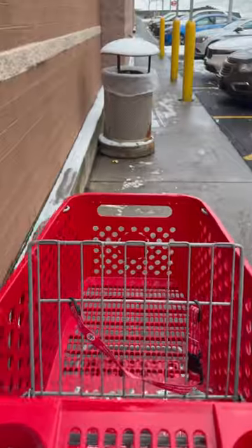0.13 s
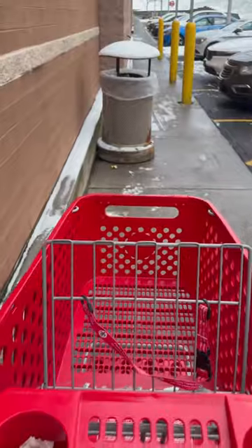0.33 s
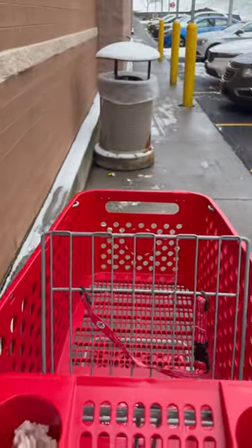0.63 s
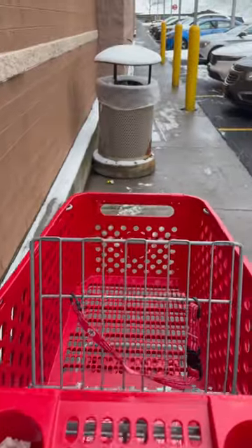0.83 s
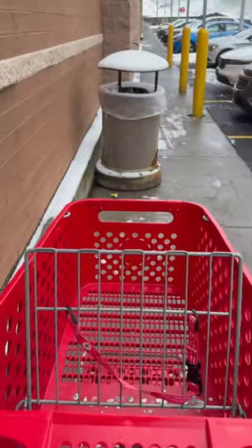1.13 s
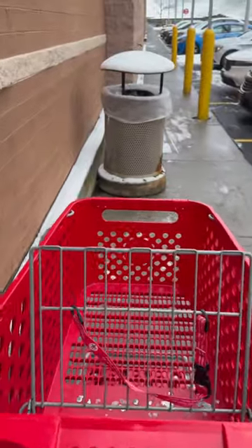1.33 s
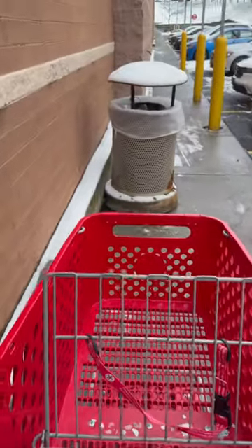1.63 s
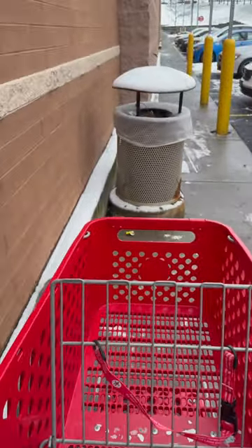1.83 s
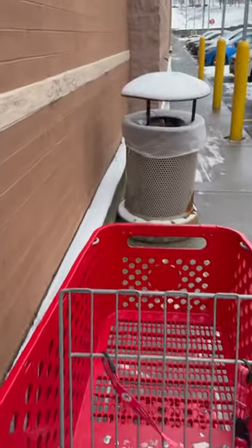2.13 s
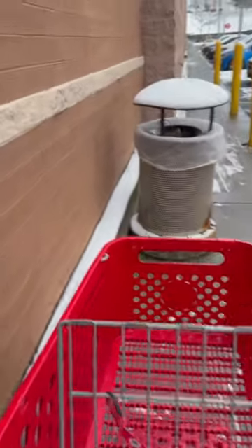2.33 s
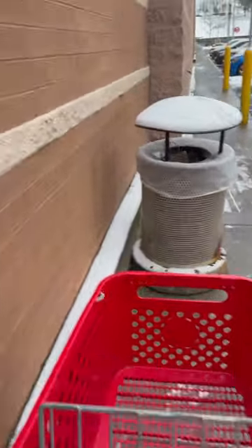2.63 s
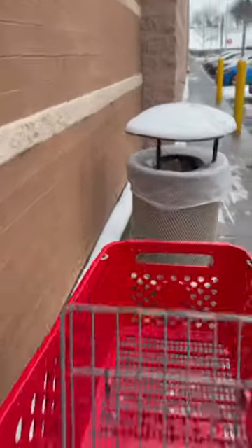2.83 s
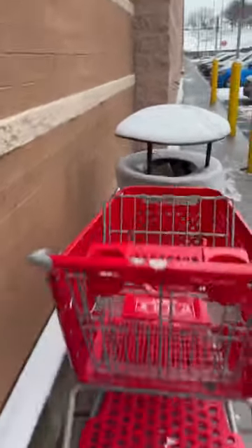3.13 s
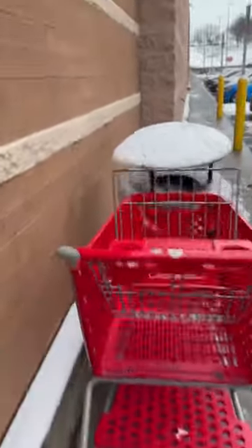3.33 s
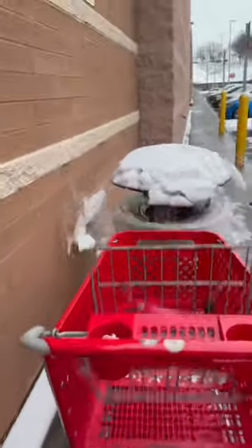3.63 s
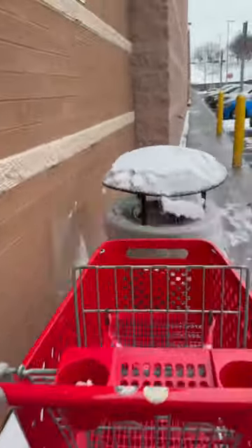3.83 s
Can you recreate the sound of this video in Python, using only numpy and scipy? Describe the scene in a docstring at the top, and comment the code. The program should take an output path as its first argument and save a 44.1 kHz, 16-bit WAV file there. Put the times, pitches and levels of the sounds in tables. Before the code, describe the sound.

A shopping cart rattles and clacks close to the microphone over outdoor pavement beside a wall, jolts over joints, then is shoved off, clatters into a metal trash can, rebounds and drops on its wheels.

```python
"""A shopping cart with a steel frame and a plastic basket rolls over pavement, close to the microphone.
Its loose steel clacks as struck noise with ringing modes, and random contacts make it rattle, hardest over joints.
Shoved off, it clatters into a metal trash can in runs of contacts, rebounds with its seat flapping
and drops back on its wheels. Behind it: wheels drumming as low noise, a short wall tail and faint street noise."""
import sys
import numpy as np
from scipy import signal
from scipy.fft import rfft, irfft, next_fast_len
from scipy.io import wavfile
from scipy.ndimage import uniform_filter1d

SR = 44100
rng = np.random.default_rng(int(sys.argv[2]) if len(sys.argv) > 2 else 0)


def to_wav(sig):
    """Store sig (one row per channel, or 1-D mono) as 16-bit WAV at the path in sys.argv[1].

    Samples outside -1..1 are clipped; the rate is SR.
    """
    pcm = np.clip(np.atleast_2d(sig), -1, 1) * 32767
    pcm = np.round(pcm).astype(np.int16)
    wavfile.write(sys.argv[1], SR, pcm.T)  # frames by channels


N = 176400  # samples in the scene
T = np.arange(SR // 3) / SR  # time within one contact, s

# Levels are relative within each table. Colours are spectra; t60 is the time to fall by 60 dB.

# Loose steel parts striking the frame.
# Each row: start in seconds, level in dB, share of the basket in dB, share of the wire gate in dB.
CLACK_EVENTS = [(0.057, -14, -4.5, -8.5), (0.0799, -8, -5.5, -16), (0.1288, -17.5, -16, -12.5),
                (0.1537, -23.5, 5, -11), (0.192, -25.5, -8, -11), (0.199, -26.5, 12, -24),
                (0.254, -20, -19, -21), (0.2877, -17.5, -2.5, -25), (0.3157, -18.5, -4, -22),
                (0.4317, -33.5, 17, -6), (0.4583, -17, -9, -14), (0.5387, -21.5, 7, -9.5),
                (0.591, -25, -6, -19), (0.6782, -22.5, 6, -27), (0.7014, -17, -25, -16),
                (0.7165, -10, -15, -16), (0.7263, -18.5, 4, -50), (0.7673, -19.5, 4.5, -23),
                (0.8123, -11, -4, -17), (0.8364, -14.5, 3, -23), (0.8955, -10, -10, -11),
                (0.9327, -5, -24, -12), (0.9602, -16, -5, -9), (0.9777, -6.5, -34, -16),
                (1.0193, -19, -14, -9), (1.0337, -8.5, -20, -14), (1.054, -13, -4, -16),
                (1.073, -10.5, 0.5, -10), (1.0894, -26.5, -6, 3), (1.116, -16.5, -4, -31),
                (1.175, -26, 9, -10), (1.2434, -26, 10, -8), (1.3222, -14.5, -6, -27),
                (1.3585, -23, 6.5, -15), (1.4373, -26, 8.5, -23), (1.483, -19.5, -14, -27),
                (1.5489, -27.5, 8, -12), (1.5878, -16.5, -8, -24), (1.6148, -23.5, 6, -46),
                (1.632, -21.5, 5.5, -35), (1.6648, -20.5, -3, -21), (1.7054, -18, -3, -14),
                (1.7095, -11, -11.5, -47), (1.7351, -12, -10, -39), (1.8705, -18, -25, -44),
                (1.8948, -24.5, 4.5, -18), (1.9988, -9.5, -7, -17.5), (2.034, -9, -18, -20),
                (2.0925, -5.5, -3, -40), (2.2619, -14, -0.5, -33), (2.3232, -18, -3, -13),
                (2.3847, -23, 3.5, -25), (2.5469, -43, 17.5, -11), (2.8857, -26.5, 10, -12),
                (2.937, -10, -28, -30), (3.0095, -21, -7, -4), (3.1783, -8.5, -32, -17),
                (3.7078, -9.5, 3, -9), (3.9482, -20, -7, -4), (3.956, -14, -15.5, -10)]
# Light, dry ticks of loose wires. Each row: start in seconds, level in dB.
TICK_EVENTS = [(.0405, -41), (0.3902, -25.5), (0.807, -18), (1.224, -26), (1.5177, -44), (1.967, -35),
               (2.4555, -62)]
# Knocks that leave one frame bar ringing. Each row: start in seconds, level in dB.
BAR_KNOCK_EVENTS = [(.538, -26.5), (.553, -30), (.96, -31), (1.05, -24), (1.71, -34.5), (2.27, -39)]
# Steady shaking while the cart is pushed. Each row: time in seconds, wire level in dB, basket level in dB.
PUSHED_SHAKING = [(.04, -44, -30.5), (.12, -37, -33.5), (.24, -45, -35.5), (.50, -41.5, -36),
                  (.68, -39, -37.5), (.76, -33.5, -34.5), (.88, -35, -31.5), (.96, -53, -25),
                  (1.13, -38, -28.5), (1.30, -61, -41), (1.37, -36, -35.5), (1.52, -49, -39.5),
                  (1.74, -42, -34.5), (1.84, -51.5, -44.5), (1.98, -48, -37), (2.21, -50, -28.5),
                  (2.35, -69, -35), (2.46, -60, -40.5), (2.54, -48, -55), (2.60, -37, -37.5),
                  (2.70, -75, -46.5), (2.86, -54, -35)]
# Shaking once the cart is let go. Each row: time in seconds, wire level in dB, basket level in dB.
FREE_SHAKING = [(2.875, -65, -39), (2.895, -21.5, -31.5), (2.93, -24.5, -28.5), (2.955, -15.5, -22.5),
                (3.05, -15.5, -21), (3.138, -19, -23), (3.168, -36, -28), (3.185, -30, -37),
                (3.26, -19, -22.5), (3.36, -21, -29), (3.40, -25, -36.5), (3.46, -21.5, -27.5),
                (3.58, -23.5, -34.5), (3.63, -21.5, -31), (3.695, -27, -31.5), (3.72, -17, -25),
                (3.80, -22.5, -32.5), (3.90, -31.5, -41), (3.942, -30, -32), (3.960, -19.5, -31),
                (4.0, -17.5, -27.5)]
# Wheels crossing pavement joints.
# Each row: peak time in seconds, level in dB, last 10 dB of rise in seconds, first 10 dB of fall in seconds.
PAVEMENT_JOINTS = [(.975, -33.5, 0.05, 0.054), (1.06, -30, 0.023, 0.064), (2.096, -20, 0.061, 0.095)]
# The cart hitting the can. Each row: start in seconds, level in dB, thud in dB, chatter length in seconds.
CAN_BLOWS = [(3.180, -17.5, -26, 0.016), (3.203, -9.5, -6, 0.0049), (3.213, -17, -6, 0.0082),
             (3.227, -11, -8, 0.016), (3.243, -13.5, 1.5, .014), (3.258, -13, -1, .014),
             (3.418, -16.5, -14, 0.0081)]
# The cart dropping back on its wheels.
# Each row: start in seconds, level in dB, thud in dB, chatter length in seconds.
WHEEL_LANDINGS = [(3.707, -14, -20, .014), (3.731, -20, -1, 0.018), (3.955, -20.5, -28, 0.02)]
# The child seat flapping. Each row: start in seconds, level in dB.
SEAT_SLAPS = [(3.243, -38), (3.327, -13.5), (3.420, -17), (3.535, -14), (3.547, -14), (3.637, -18),
              (3.648, -12.5), (3.658, -17)]
# A falling ring on the rebound. One row: start in seconds, starting pitch in Hz,
# time constant of the fall in seconds, time to the peak in seconds, level in dB, roughness from 0 to 1.
REBOUND_ZING = (3.419, 2000, .033, .017, -19, .25)
# The scuffing wheel's squeak. One row: start in seconds, starting pitch in Hz,
# time constant of the fall in seconds, time to the peak in seconds, level in dB, roughness from 0 to 1.
WHEEL_SQUEAK = (2.762, 3720, 1.4, .055, -38, .08)
# Drumming of the wheels. Each row: time in seconds, level in dB.
WHEEL_RUMBLE = [(0.04, -32), (0.36, -37.5), (2.19, -34), (2.31, -37), (2.36, -38), (2.43, -37.5),
                (3.08, -30), (3.17, -41), (3.27, -35), (3.4, -47), (3.44, -35), (4.0, -59)]
# Wheels dropping into dents. Each row: start in seconds, level in dB.
DENT_BUMPS = [(.845, -24), (1.76, -20.5), (1.865, -37), (2.34, -19), (3.46, -41)]
# A wheel scuffing as the cart is shoved. Each row: time in seconds, level in dB.
SHOVE_SCUFF = [(2.745, -39), (2.772, -27.5), (2.80, -41), (2.85, -38.5), (2.875, -40)]

# Modes of the steel frame. Each row: pitch in Hz, level in dB, t60 in seconds.
FRAME_MODES = [(421, 2, 0.076), (956, 8, 0.09), (1666, 4.5, 0.35), (1990, 14, 0.098), (2360, -19.5, 0.13),
               (3610, 1, 0.26), (4450, 6.5, 0.051), (4710, 6, 0.068), (5520, 7, 0.13), (6200, 5, 0.12),
               (7300, 3, 0.26), (7520, -21, 0.17), (8030, 4, 0.21)]
# Modes of one frame bar. Each row: pitch in Hz, level in dB, t60 in seconds.
BAR_MODES = [(1690, -8, 0.075), (1958, 1, 0.17), (2300, -3, 0.096)]
# Modes of the plastic basket. Each row: pitch in Hz, level in dB, t60 in seconds.
BASKET_BODY_MODES = [(443, 6.5, 0.082), (539, 3, 0.12), (1024, -1, 0.03), (1172, 7, 0.075)]
# Modes of the trash can. Each row: pitch in Hz, level in dB, t60 in seconds.
CAN_MODES = [(132, 5, .16), (209.6, -2, 0.39), (650, 1.5, 0.29), (829, 8, 0.2), (990, -1, 0.24),
             (1080, -6, 0.17), (1370, 11.5, 0.11), (1700, -7, 0.2), (2040, -8, 0.16), (2320, 6.5, 0.29)]
# Modes of a wheel bump. Each row: pitch in Hz, level in dB, t60 in seconds.
DENT_MODES = [(60.7, 1, 0.27), (96.5, 8, 0.1)]

# Colour of wire contacts. Each row: frequency in Hz, level in dB per Hz.
WIRE_COLOUR = [(800, -23), (1800, -3.5), (2500, -2), (3200, -6.5), (3900, -4), (4500, -2), (5200, -3),
               (6200, -0.5), (8100, 2), (10000, 2), (11500, -23), (14000, -4), (16000, -11)]
# Colour of the wire gate. Each row: frequency in Hz, level in dB per Hz.
GATE_COLOUR = [(1500, -47), (3900, -11), (4300, 1.5), (4480, 1.5), (4750, -9.5), (5200, -5.5), (6150, -2),
               (6700, -3), (12000, -11.5)]
# Colour of basket knocks. Each row: frequency in Hz, level in dB per Hz.
BASKET_COLOUR = [(90, -31), (210, -1), (320, -2), (460, 1), (700, -1), (1000, 2), (1400, 0), (2000, -2),
                 (2700, -3.5), (4000, -10), (9000, -54)]
# Colour of crash contacts. Each row: frequency in Hz, level in dB per Hz.
CRASH_COLOUR = [(90, -37), (220, 0), (450, -14.5), (1000, 0.5), (1500, -4), (2400, 0.5), (3300, -4.5),
                (5000, -10.5), (10000, -32), (16000, -40)]
# Colour of the thud under a blow. Each row: frequency in Hz, level in dB per Hz.
THUD_COLOUR = [(25, -31), (60, -14), (110, -4), (200, -7), (330, -0.5), (600, -14), (2000, -50)]
# Colour of the seat slaps. Each row: frequency in Hz, level in dB per Hz.
SEAT_COLOUR = [(200, -10.5), (700, -8), (1500, -5), (2100, -7), (2500, 7.5), (2900, -2.5), (3500, -4),
               (4500, -8), (12000, -40)]
# Colour of the drumming wheels. Each row: frequency in Hz, level in dB per Hz.
WHEEL_COLOUR = [(20, -27), (35, -7), (55, -5), (74, -1.5), (115, -6), (160, -13), (300, -21), (700, -21),
                (3000, -41)]
# Colour of the scuffing wheel. Each row: frequency in Hz, level in dB per Hz.
SCUFF_NOISE_COLOUR = [(1500, -4), (3500, -5), (5600, -1), (7000, 7.5), (8300, 3.5), (10500, 0),
                      (15000, -15)]
# Colour of the street. Each row: frequency in Hz, level in dB per Hz.
STREET_COLOUR = [(30, -18), (1000, 14), (3000, -28), (16000, -40)]

# Decay of the dense ring after a contact. Each row: frequency in Hz, t60 in seconds.
CONTACT_RING_T60 = [(200, 0.099), (1000, 0.16), (2800, 0.15), (7500, 0.12), (15000, 0.045)]
# Decay of the wall's answer. Each row: frequency in Hz, t60 in seconds.
WALL_TAIL_T60 = [(200, 1), (2000, 0.17), (8000, 0.26), (15000, 0.31)]
# Left-right likeness. Each row: frequency in Hz, likeness from -1 (opposed) to 1 (the same).
LIKENESS = [(60, 0.88), (300, 0.99), (700, 0.83), (1300, 0.97), (1900, 1), (2400, 0.53), (3300, -0.02),
            (4400, 0.3), (6000, 0.6), (8000, 0.074), (9700, -0.88), (10800, -1), (14000, -1),
            (15000, -0.59)]
# Lean of the stereo image. Each row: frequency in Hz, left above right in dB.
LEAN = [(100, 0.8), (250, 0.5), (520, 3.0), (1000, 2.8), (2000, -0.5), (6000, 0)]

START_S, TOP_HZ = .035, 15800  # silence before the start, upper band limit
FRAME_DETUNE = .018  # spread of the wires' tuning, share of the pitch
ROLL_CRACK_S, ROLL_RING_DB = .0018, -12  # rolling contacts are short and dry
ROLL_SCATTER_DB = 5  # spread of contact strengths while rolling
JOINT_BASKET_DB = -2.5  # basket against wire over a joint


def amp(db):
    """Decibels as a linear gain."""
    return 10 ** (np.asarray(db) / 20)


def unit(x):
    """Scale x to rms 1."""
    return x / np.sqrt(np.mean(x ** 2) + 1e-20)


def along(points, hz):
    """Read (Hz, value) points at any frequency, on a log axis."""
    f, v = np.transpose(points)
    return np.interp(np.log(hz + 1), np.log(f + 1), v)


def gains(rows):
    """One gain per sample for each dB column, fading to -90 dB outside the rows."""
    s, *columns = np.transpose(rows)
    times = np.r_[s[0] - .04, s, s[-1] + .04]
    t = np.arange(N) / SR
    return [amp(np.interp(t, times, np.r_[-90, db, -90])) for db in columns]


def filtered(x, response):
    """Shape x by a response given as a function of frequency."""
    n = x.shape[-1]
    m = next_fast_len(n + 4096)
    spectrum = rfft(x, m) * response(np.fft.rfftfreq(m, 1 / SR))
    return irfft(spectrum, m)[..., :n]


def noise(colour, size):
    """Two unrelated coloured noises, scaled together to rms 1."""
    return unit(filtered(rng.standard_normal((2, size)), lambda hz: amp(along(colour, hz))))


def fade(x, t60):
    """Let each frequency die at its own speed."""
    hz, t, z = signal.stft(x, SR, nperseg=256)
    decay = amp(-60 * t / along(t60, hz)[:, None])
    return signal.istft(z * decay, SR, nperseg=256)[1][:, :x.shape[1]]


def add(out, s, x):
    """Mix x into out at time s."""
    i = max(0, round(s * SR))
    out[:, i:i + x.shape[1]] += x[:, :max(0, N - i)]


def ring(modes, detune=0):
    """Decaying modes, each struck with a chance strength and phase, and detuned by chance if asked."""
    hz, db, t60 = np.transpose(modes)[:, :, None]
    strength = amp(db + 3.7 * rng.standard_normal(db.shape)) / np.linalg.norm(amp(db))
    hz = hz * (1 + detune * rng.standard_normal(hz.shape))
    wave = np.exp((2j * np.pi * hz - np.log(1000) / t60) * T)
    turn = np.exp(2j * np.pi * rng.random((2, len(modes))))
    return np.sqrt(2) * ((turn * strength.T) @ wave).real


def contact(colour, crack_s, ring_db, uneven_db=3):
    """A sharp crack that leaves a dense, short ring; every point of impact has its own colour."""
    knots = np.linspace(0, np.sqrt(TOP_HZ), num=60) ** 2
    ripple = uneven_db * rng.standard_normal(len(knots))
    x = unit(filtered(noise(colour, len(T)), lambda hz: amp(np.interp(hz, knots, ripple))))
    crack = x * np.exp(-T / crack_s)
    dense_ring = amp(ring_db) * fade(x, CONTACT_RING_T60)
    attack = 1 - np.exp(-T / 0.00055)
    return (crack + dense_ring) * attack


def struck(events, modes, attack_s):
    """One set of modes rung at each (s, dB) event."""
    out = np.zeros((2, N))
    for s, db in events:
        add(out, s, amp(db) * ring(modes) * (1 - np.exp(-T / attack_s)))
    return out


def slide(s, hz, fall_s, peak_s, db, rough):
    """A short, rough tone that swells, slides down in pitch and fades."""
    out = np.zeros((2, N))
    waver = unit(uniform_filter1d(rng.standard_normal(len(T)), size=24))
    pitch = hz * np.exp(-T / fall_s) * (1 + rough * waver)
    phase = 2 * np.pi * np.cumsum(pitch) / SR
    swell = T / peak_s * np.exp((1 - (T / peak_s) ** 2) / 2)
    add(out, s, amp(db) * swell * np.array([np.sin(phase), np.cos(phase)]))
    return out


def clacks():
    """Single blows of steel on steel; each also shakes the wire gate and knocks the basket."""
    out = np.zeros((2, N))
    usual_basket_db, usual_gate_db = np.mean(CLACK_EVENTS, axis=0)[2:]
    for s, db, basket_db, gate_db in CLACK_EVENTS:
        steel = contact(WIRE_COLOUR, crack_s=.003, ring_db=-8, uneven_db=1.0)
        steel += amp(-13.5) * ring(FRAME_MODES, FRAME_DETUNE)
        gate = contact(GATE_COLOUR, crack_s=0.0035, ring_db=-10)
        gate *= amp(gate_db - usual_gate_db - 6.0)
        basket = contact(BASKET_COLOUR, crack_s=.007, ring_db=-1)
        basket += amp(-1.0) * ring(BASKET_BODY_MODES)
        basket *= amp(basket_db - usual_basket_db - 15.0)
        add(out, s, amp(db - 5.0) * (steel + gate + basket))
    return out


def ticks():
    """Single wires touch lightly between the clacks, as short dry contacts."""
    out = np.zeros((2, N))
    for s, db in TICK_EVENTS:
        add(out, s, amp(db) * contact(WIRE_COLOUR, crack_s=ROLL_CRACK_S, ring_db=ROLL_RING_DB))
    return out


def chatter(colour, rate, scatter_db, modes_db, crack_s=.0024, ring_db=-7, count=10):
    """Loose parts, together making rate hits a second at random, each with its own ring; rms 1."""
    out = np.zeros((2, N))
    for _ in range(count):
        strengths = amp(scatter_db * np.clip(rng.standard_normal(N), -2, 2))
        hits = (rng.random(N) < rate / count / SR) * strengths
        part = contact(colour, crack_s, ring_db, uneven_db=4)
        part += amp(modes_db) * ring(FRAME_MODES, FRAME_DETUNE)
        out += signal.fftconvolve(hits[None], part, axes=1)[:, :N]
    return unit(out)


def rattle():
    """Wires and basket chatter sparsely on smooth ground, densely over joints and when let go."""
    t = np.arange(N) / SR
    jolt = np.zeros(N)
    for s, db, rise, fall in PAVEMENT_JOINTS:
        distance = np.maximum((s - t) / rise, (t - s) / fall)
        jolt += amp(db - 10 * distance ** 2.14)
    wire, basket = gains(PUSHED_SHAKING)
    wild_wire, wild_basket = gains(FREE_SHAKING)
    gentle_wire = wire * chatter(WIRE_COLOUR, rate=140, scatter_db=ROLL_SCATTER_DB, modes_db=-27,
                                 crack_s=ROLL_CRACK_S, ring_db=ROLL_RING_DB)
    gentle_basket = basket * chatter(BASKET_COLOUR, rate=260, scatter_db=ROLL_SCATTER_DB,
                                     modes_db=-18, ring_db=ROLL_RING_DB)
    hard_wire = chatter(WIRE_COLOUR, rate=710, scatter_db=1.0, modes_db=-21.0)
    hard_wire *= wild_wire + jolt
    hard_basket = chatter(BASKET_COLOUR, rate=900, scatter_db=2.5, modes_db=-19)
    hard_basket *= wild_basket + amp(JOINT_BASKET_DB) * jolt
    return gentle_wire + gentle_basket + hard_wire + hard_basket


def crash(blows, modes):
    """Each blow is a quick run of five contacts that ring the can or the basket, over a dull thud."""
    out = np.zeros((2, N))
    for s, db, thud_db, length in blows:
        for share in np.r_[0, rng.random(4)]:
            clang = contact(CRASH_COLOUR, crack_s=.005, ring_db=-9.5, uneven_db=7.0)
            clang += amp(-13.0) * ring(modes)
            # later contacts in the run are weaker
            add(out, s + share * length, amp(db - 3.0 - 4.2 * share) * clang)
        thud = contact(THUD_COLOUR, crack_s=0.025, ring_db=-23)
        add(out, s, amp(db + thud_db - 9) * thud)
    return out


def seat():
    """The plastic seat slaps against its wire gate, each slap a crack with a short ring."""
    out = np.zeros((2, N))
    for s, db in SEAT_SLAPS:
        add(out, s, amp(db) * contact(SEAT_COLOUR, crack_s=.0045, ring_db=-9, uneven_db=0.5))
    return out


def wheels():
    """Hard wheels drum on the rough pavement, drop into dents, and scuff and squeak at the shove."""
    drumming = gains(WHEEL_RUMBLE)[0] * noise(WHEEL_COLOUR, N)
    bumps = struck(DENT_BUMPS, DENT_MODES, attack_s=0.012)
    scuff = gains(SHOVE_SCUFF)[0] * noise(SCUFF_NOISE_COLOUR, N)
    return drumming + bumps + scuff + slide(*WHEEL_SQUEAK)


def wall(x):
    """The store front answers with a short diffuse tail of decaying noise."""
    tail = fade(rng.standard_normal((2, len(T))), WALL_TAIL_T60) * (1 - np.exp(-T / 0.01))
    return signal.fftconvolve(x, tail / np.linalg.norm(tail[0]), axes=1)[:, :N]


def street():
    """A steady, faint bed of coloured noise."""
    return amp(-51.0) * noise(STREET_COLOUR, N)


def spread(pair):
    """Turn two unrelated signals into left and right that agree in the bass and oppose in the treble."""
    def mid_and_side(hz):
        angle = np.arccos(np.clip(along(LIKENESS, hz), -.995, .995)) / 2
        return np.array([np.cos(angle), np.sin(angle)])

    mid, side = filtered(pair, mid_and_side)
    halves = np.array([[.5], [-.5]])  # left up, right down
    return filtered(np.array([mid + side, mid - side]), lambda hz: amp(along(LEAN, hz) * halves))


def scene():
    """The cart and its collisions, the wall's answer, the wheels and the street, spread in stereo."""
    cart = clacks() + ticks() + rattle()
    cart += crash(CAN_BLOWS, CAN_MODES) + crash(WHEEL_LANDINGS, BASKET_BODY_MODES)
    cart += seat() + slide(*REBOUND_ZING)
    cart += struck(BAR_KNOCK_EVENTS, BAR_MODES, attack_s=0.0009)
    return spread(cart + amp(-18) * wall(cart) + wheels() + street())


def record(dry):
    """After a brief silence the sound begins; the microphone rounds off the highest peaks and cuts above its
    band limit."""
    x = dry * (np.arange(N) / SR > START_S)
    x = x / (1 + np.abs(x / .92) ** 6) ** (1 / 6)
    return filtered(x, lambda hz: hz < TOP_HZ)


dry = scene()
out = record(dry)
to_wav(out)
```